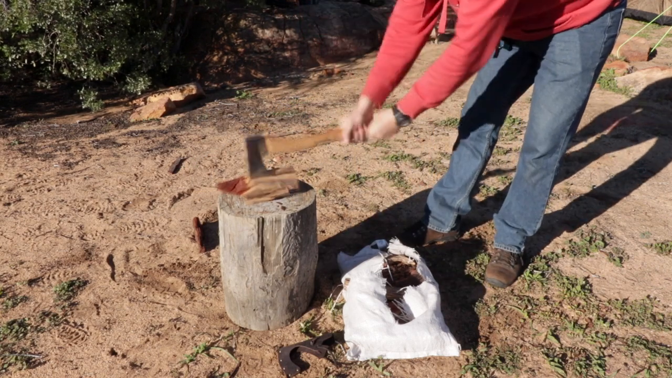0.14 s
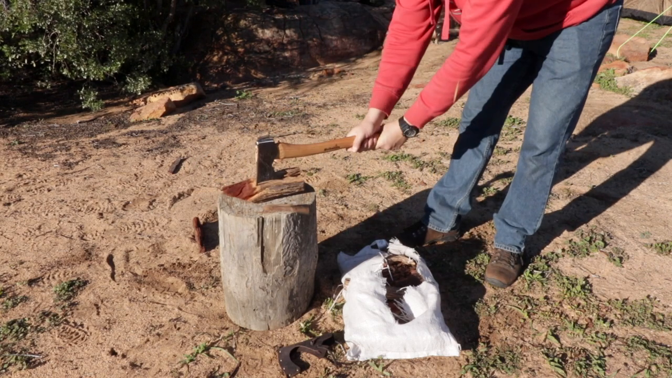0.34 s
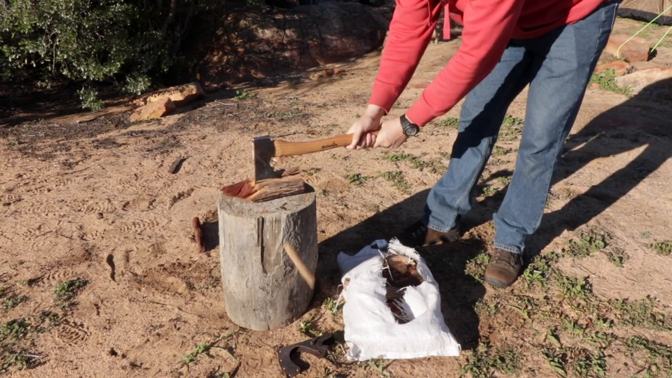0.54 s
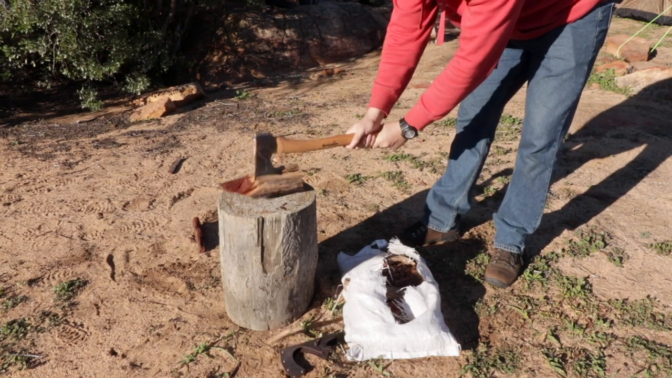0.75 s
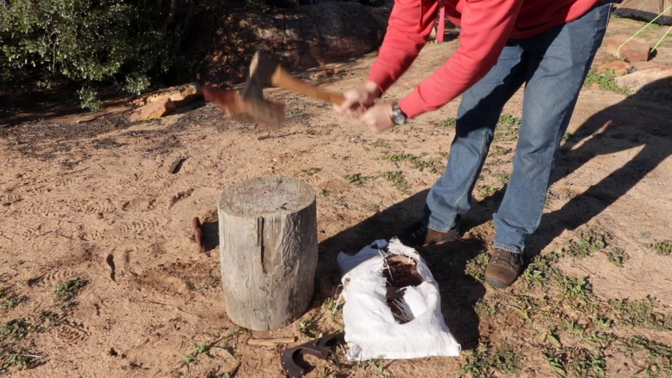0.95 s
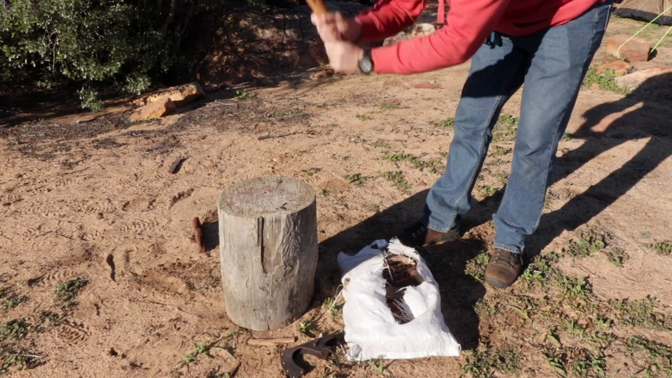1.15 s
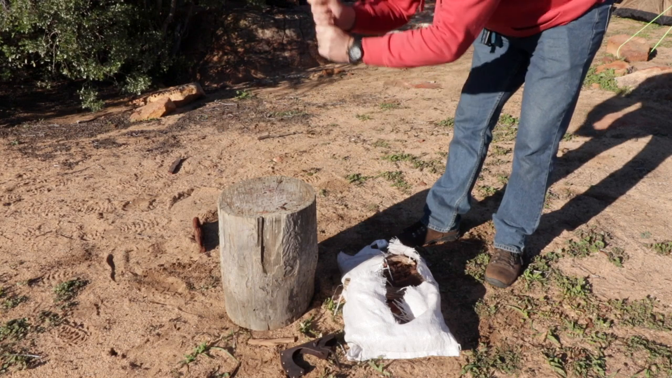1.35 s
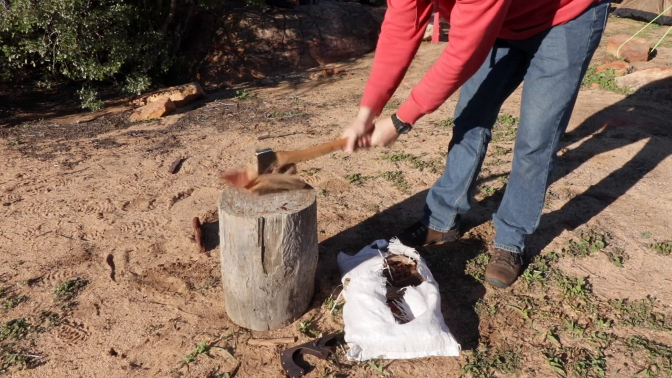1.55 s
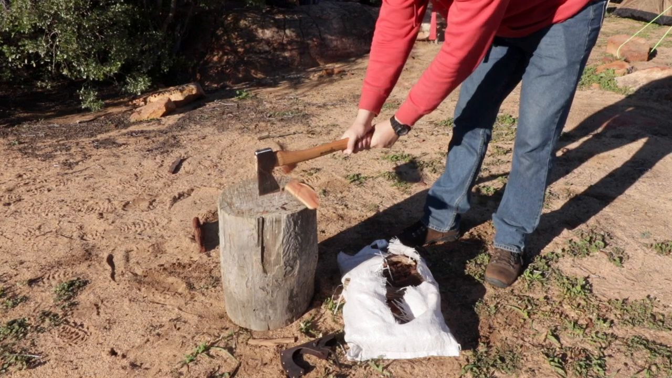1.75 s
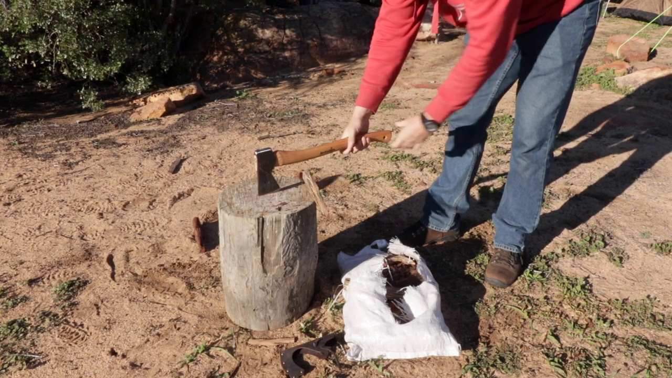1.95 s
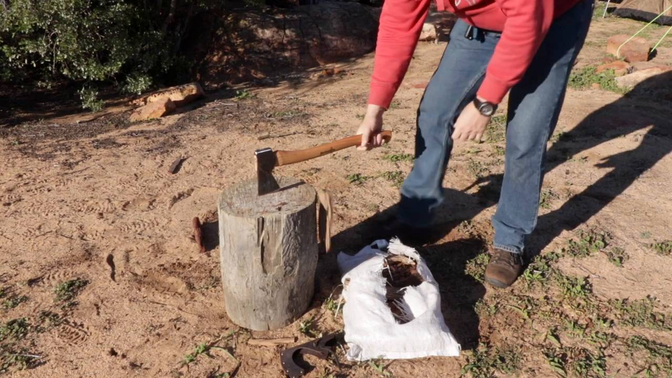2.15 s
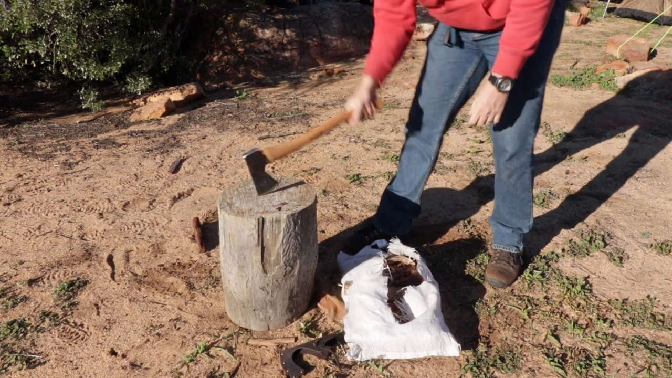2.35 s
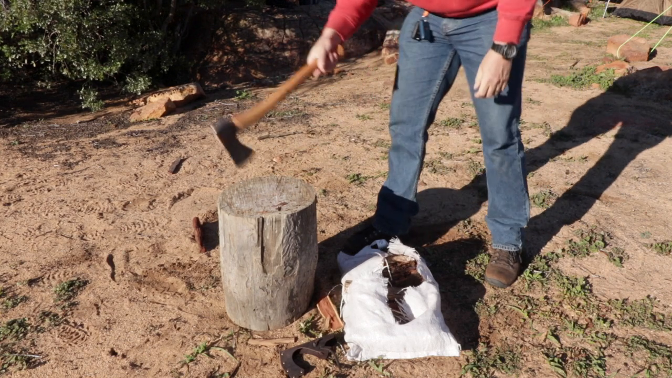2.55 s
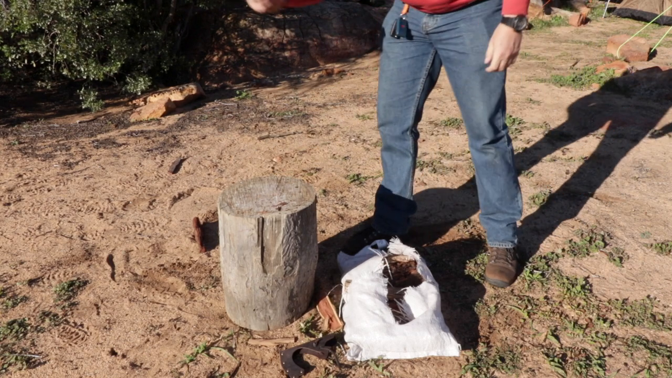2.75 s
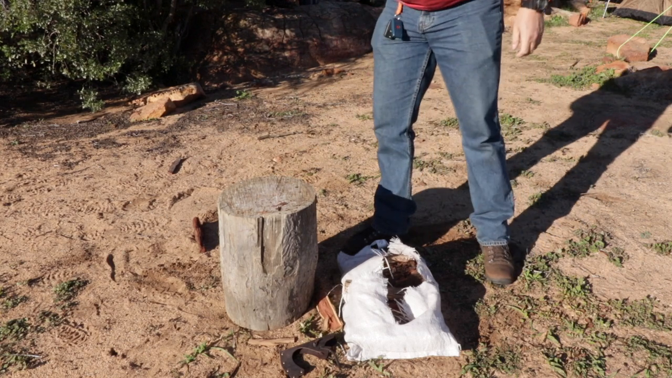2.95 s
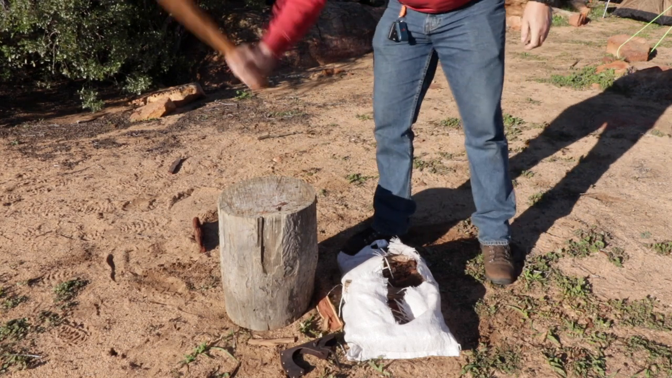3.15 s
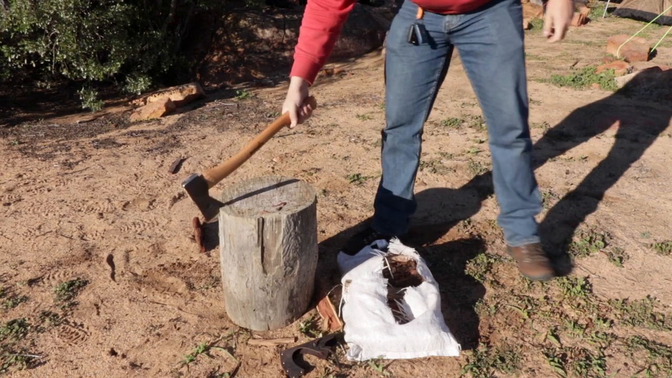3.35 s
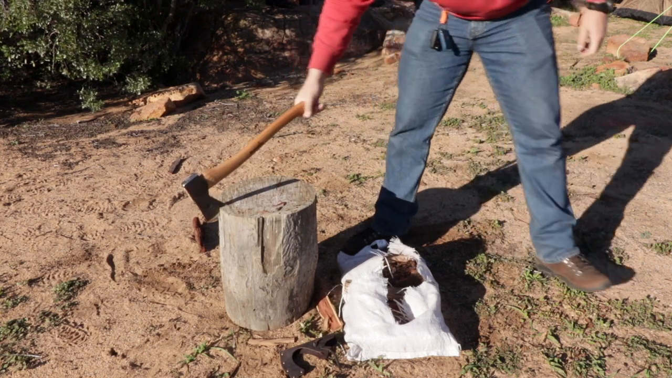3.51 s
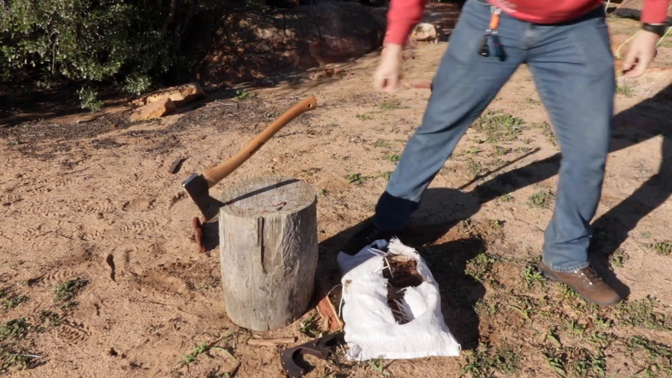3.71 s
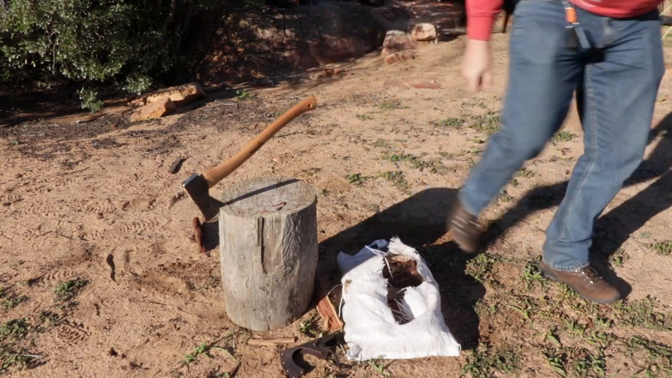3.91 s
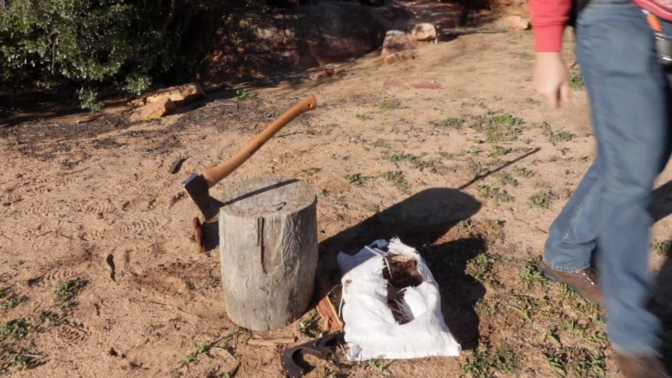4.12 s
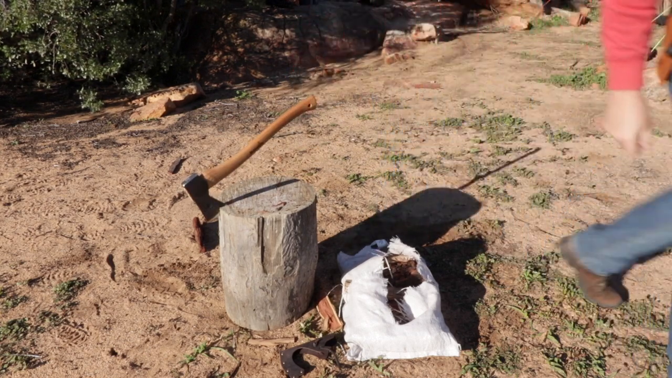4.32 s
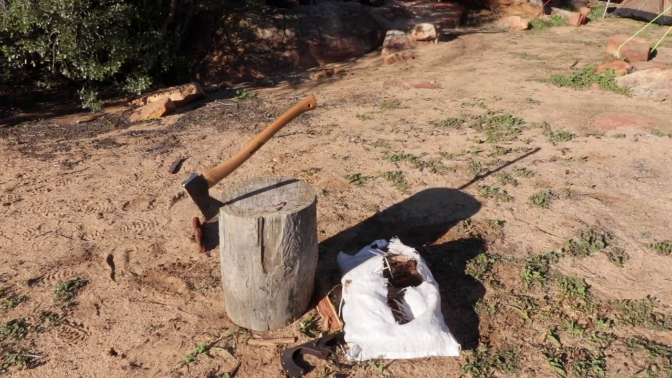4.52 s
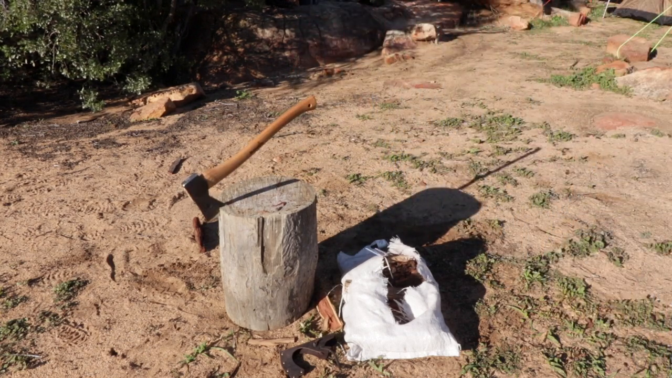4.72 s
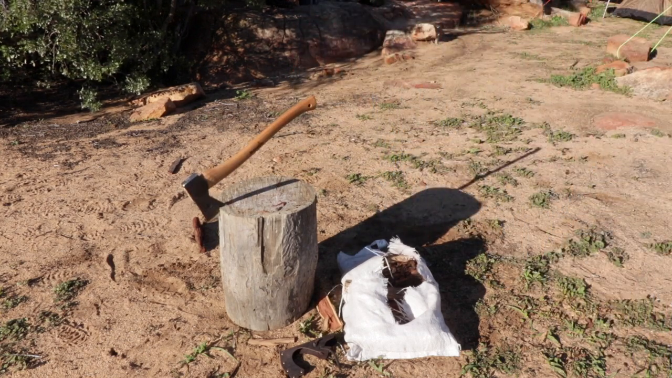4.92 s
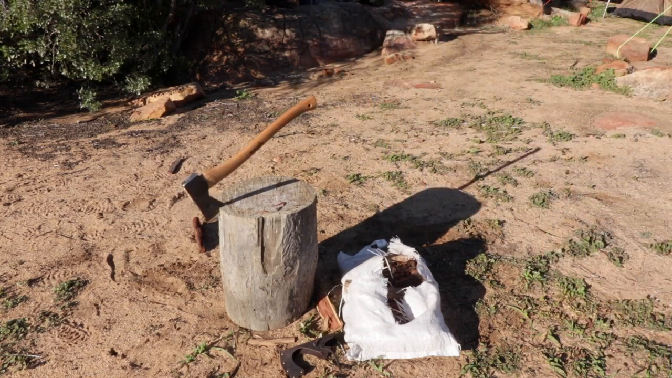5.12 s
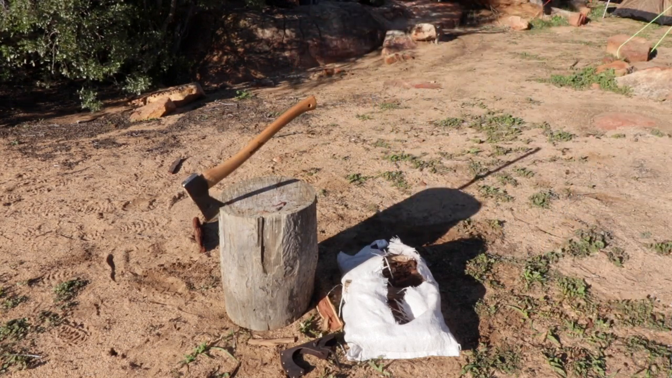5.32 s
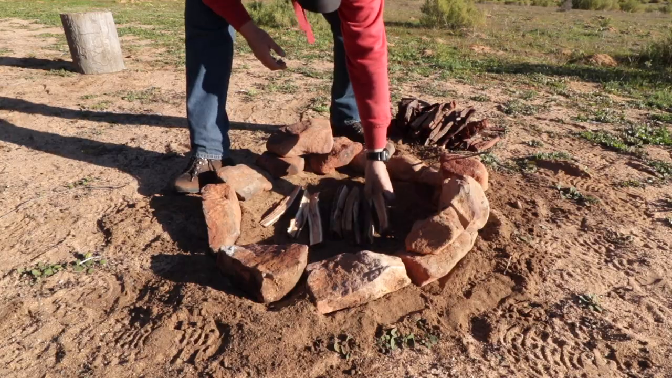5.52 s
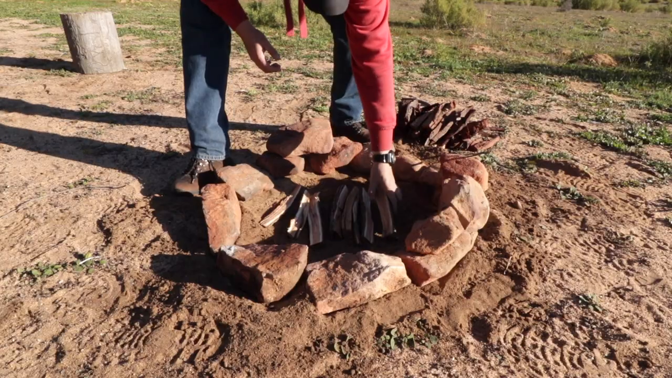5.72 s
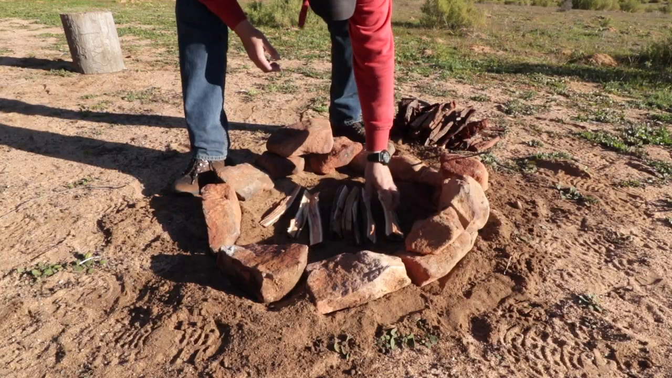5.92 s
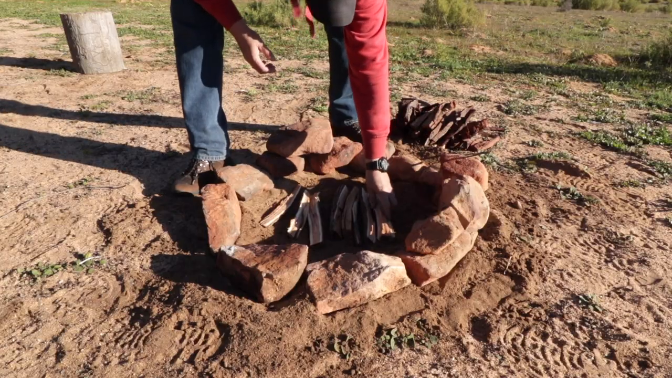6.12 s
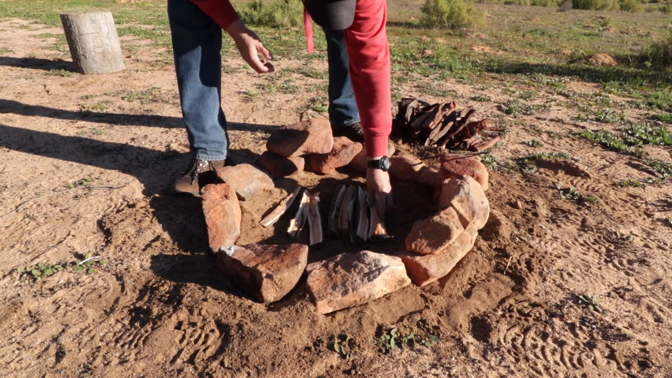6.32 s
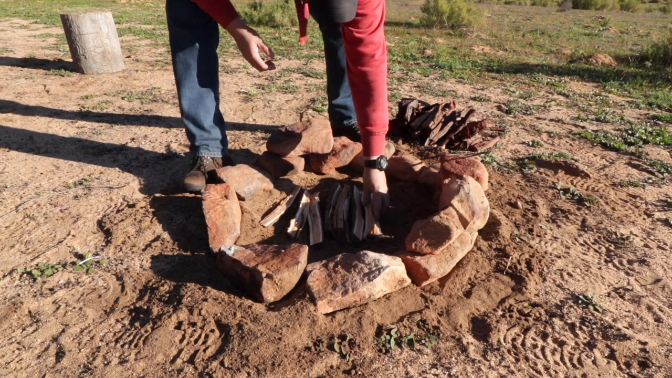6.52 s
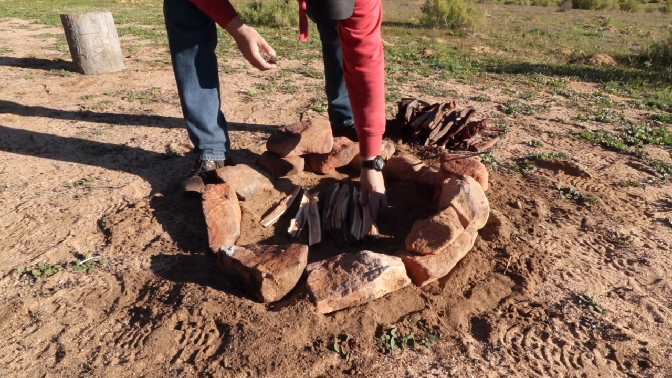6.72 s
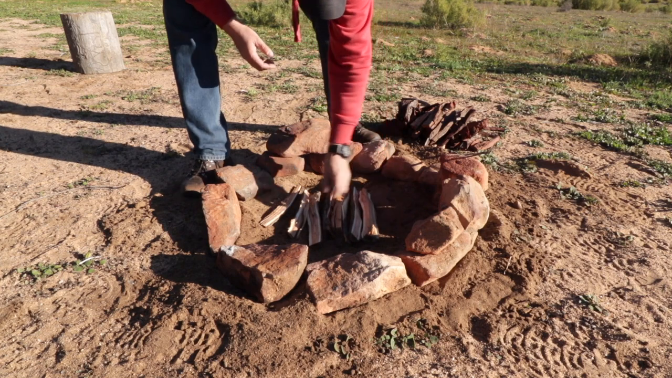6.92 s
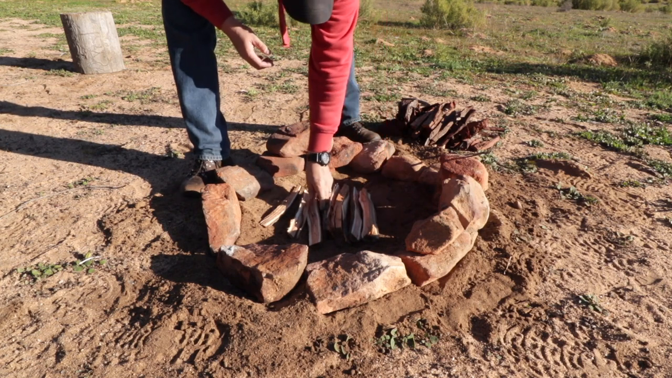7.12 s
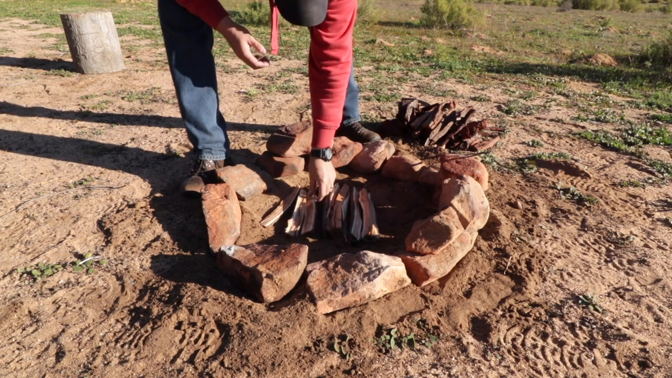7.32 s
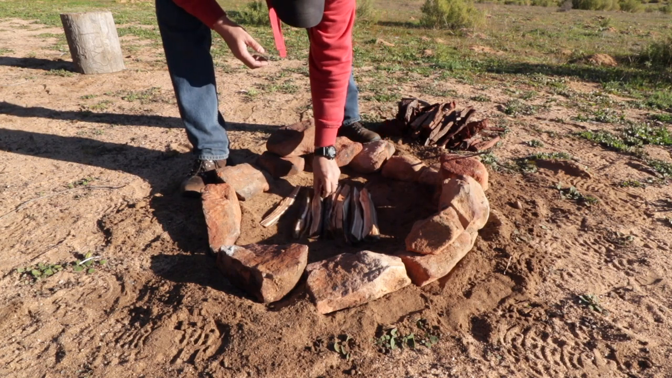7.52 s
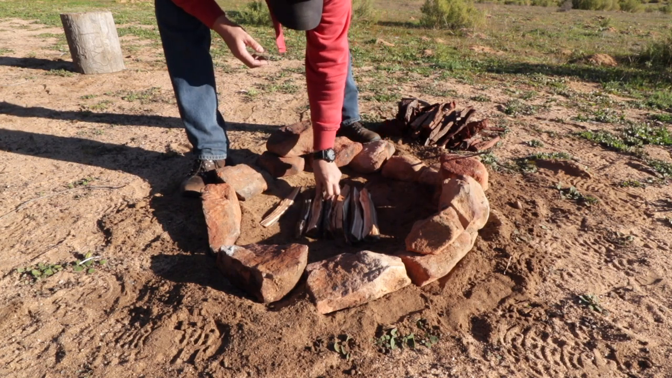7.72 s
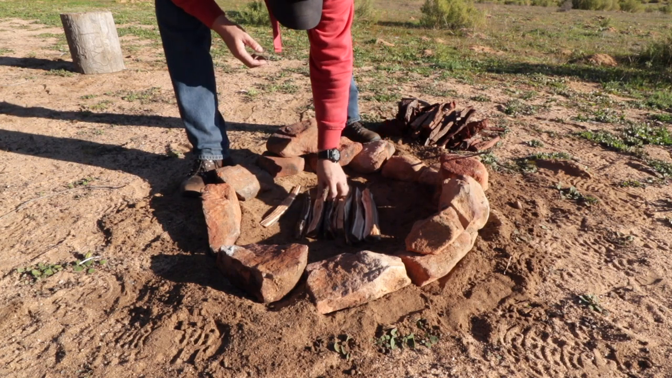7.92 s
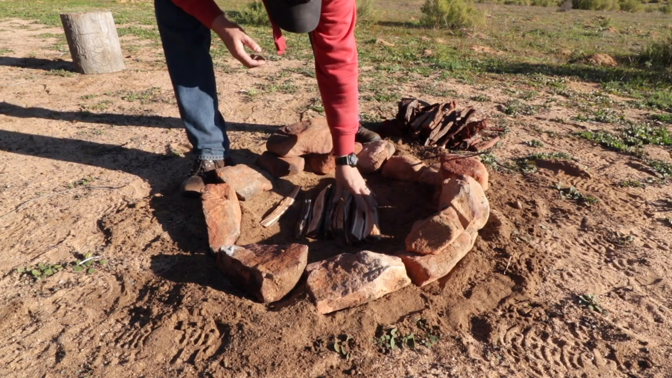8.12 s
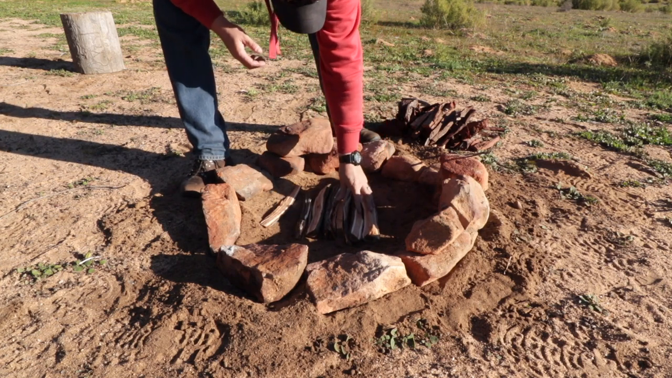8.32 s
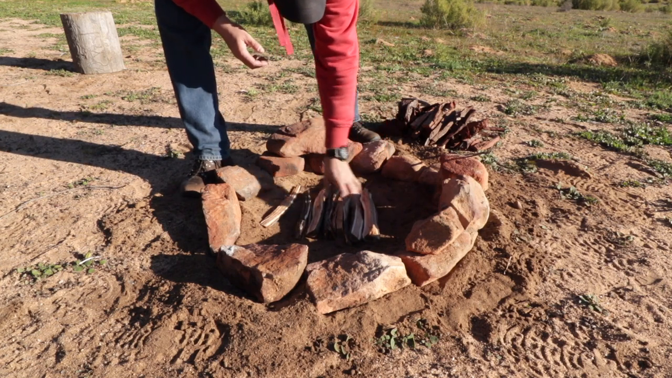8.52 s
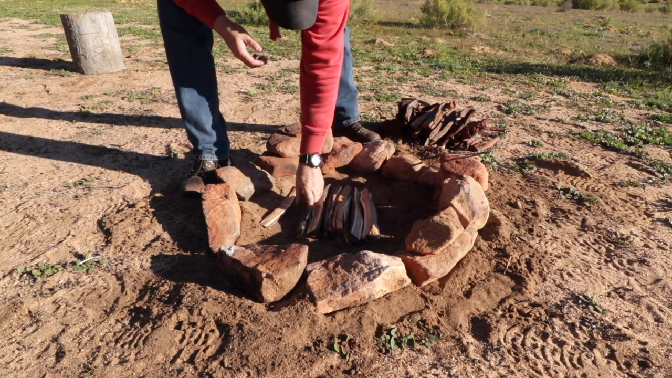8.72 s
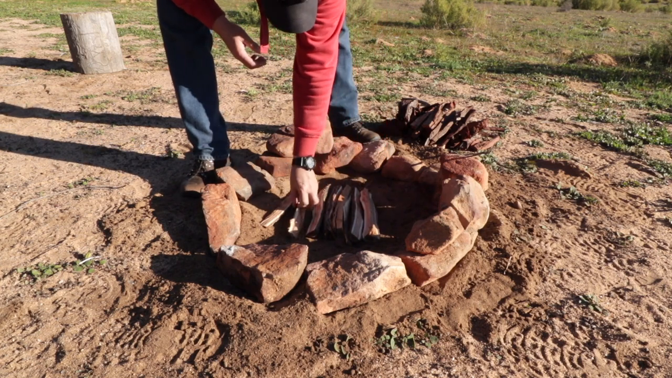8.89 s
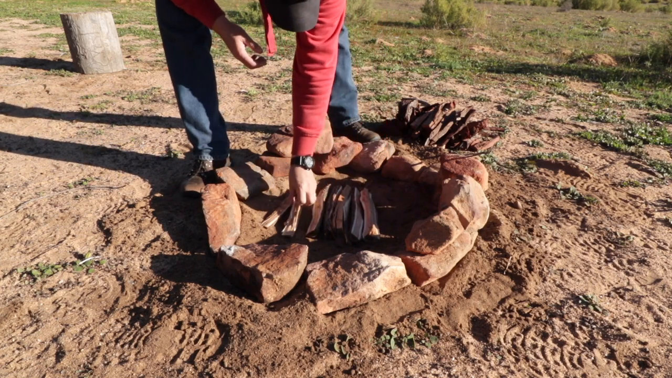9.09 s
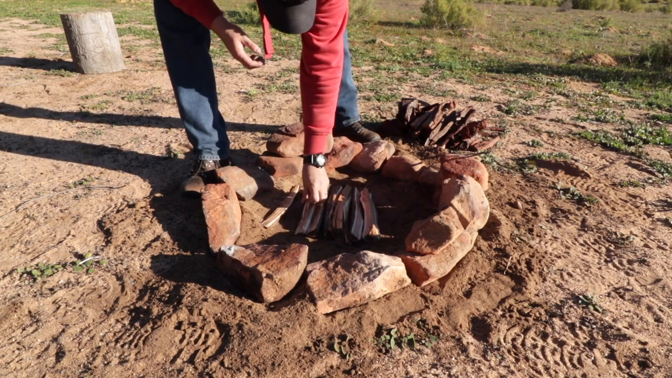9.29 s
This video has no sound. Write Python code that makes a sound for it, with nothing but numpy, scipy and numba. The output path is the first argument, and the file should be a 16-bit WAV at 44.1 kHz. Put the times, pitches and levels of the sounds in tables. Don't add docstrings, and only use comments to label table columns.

```python
import sys
import numpy as np
from scipy import signal
from scipy.fft import rfft, irfft
from scipy.io import wavfile
from scipy.ndimage import uniform_filter1d
from numba import njit

SR = 44100
rng = np.random.default_rng(int(sys.argv[2]) if len(sys.argv) > 2 else 0)


def natural_amplitude(level_db):
    exponent = np.asarray(level_db, float) / 20
    return 10 ** exponent


def to_wav(sig):
    pcm = np.clip(np.atleast_2d(sig), -1, 1) * 32767
    pcm = np.round(pcm).astype(np.int16)
    wavfile.write(sys.argv[1], SR, pcm.T)


N = 412335
SCENE_CHANGE_S = 5.418


def noise():
    return rng.standard_normal(N)


def unit(x):
    return x / np.sqrt(np.mean(x ** 2))


def peak(x):
    return x / np.max(np.abs(x))


def seconds(length_s):
    return np.arange(int(length_s * SR)) / SR


def colour(points, size=4096):
    hz, db = np.transpose(points)
    bin_hz = np.arange(size // 2 + 1) * SR / size
    level_db = np.interp(np.log(bin_hz + 1), np.log(hz), db)
    cepstrum = irfft(np.log(natural_amplitude(level_db)))
    cepstrum[1:size // 2] *= 2
    cepstrum[size // 2 + 1:] = 0
    h = irfft(np.exp(rfft(cepstrum)))
    return h / np.sqrt(np.sum(h ** 2))


def tilted(points, slope_db_per_oct):
    return [(hz, db + slope_db_per_oct * np.log2(hz / 1000)) for hz, db in points]


def shaped(x, points):
    return signal.oaconvolve(x, colour(points))[:len(x)]


def band(x, lo_hz, hi_hz, order=2):
    return signal.sosfilt(signal.butter(order, [lo_hz, hi_hz], "bandpass", fs=SR, output="sos"), x)


@njit
def moving_band(x, hz, width_hz):
    y, b, l = np.empty(len(x)), 0., 0.
    for i in range(len(x)):
        g, k = np.tan(np.pi * hz[i] / SR), width_hz / hz[i]
        v = (b + g * (x[i] - l)) / (1 + g * (g + k))
        b, l, y[i] = 2 * v - b, l + 2 * g * v, k * v
    return y


def fade(t, t60_s):
    return 1000. ** (-t / max(t60_s, .001))


def walk(rate_hz):
    k = int(SR / rate_hz)
    held = np.repeat(rng.standard_normal(N // k + 1), k)
    slewed = uniform_filter1d(uniform_filter1d(held, k), k)
    return unit(slewed[:N])


def curve(rows):
    s, *columns = np.transpose(rows)
    t = np.arange(N) / SR
    return [np.interp(t, s, c) for c in columns] + [(t >= s[0]) & (t <= s[-1])]


def grit(rate_hz, spread_db):
    hits = noise() * (rng.random(N) < rate_hz / SR)
    size_db = spread_db * np.minimum(rng.exponential(size=N), 4)
    return unit(hits * natural_amplitude(size_db))


def add(out, s, x):
    i = int(s * SR)
    out[i:i + len(x)] += x[:N - i]


def strokes(rows):
    out = np.zeros((2, N))
    for s, length_s, *levels_db in rows:
        shape = signal.windows.tukey(int(1.705 * length_s * SR), .9)
        for envelope, db in zip(out, levels_db):
            add(envelope, max(s - 0.38 * length_s, 0), natural_amplitude(db) * shape)
    return out


def ring(push, modes, t):
    out = 0
    for hz, db, t60_s in modes:
        spin = np.exp(2j * np.pi * hz * t)
        reach = max(abs(push @ spin), .3 * np.sqrt(push @ push))
        decay = signal.fftconvolve(push, spin.imag * fade(t, t60_s))[:len(t)]
        out = out + natural_amplitude(db) / reach * decay
    return out


# (frequency [Hz], level [dB], T60 [s])
FIRST_PIECE = [(395, -3.5, 0.012), (580, -4.5, .016), (1020, -4, 0.017), (1610, -3, 0.008),
               (2100, -4, 0.012), (3477, -1, 0.0081), (5170, -8.5, 0.0088)]
# (frequency [Hz], level [dB], T60 [s])
SECOND_PIECE = [(360, -9, .02), (1300, -10.5, .008), (2120, 2, 0.0081), (2890, -4, 0.019),
                (5000, -10.5, .01)]
# (frequency [Hz], level [dB], T60 [s])
FREED_PIECE = [(690, -15, 0.019), (1083, 0, 0.08), (2160, -14.5, 0.035), (4940, -19, .05)]
# (frequency [Hz], level [dB], T60 [s])
LOG_END = [(94, -25, 0.085), (152, -19, .04), (307, 0.5, 0.025), (472, -9.5, 0.028), (1470, -29, 0.006),
           (3680, -10, 0.0085)]
# (frequency [Hz], level [dB], T60 [s])
STUMP = [(93, -10, 0.12), (147, -13.5, 0.013), (305, 0.5, 0.015), (480, -1.5, 0.01)]
# (frequency [Hz], level [dB], T60 [s])
RIM = [(539, -4, 0.025), (694, -1, 0.04), (1023, -2.5, 0.027), (1466, -12, 0.032), (2330, -15, 0.026),
       (2900, -10, 0.013), (3465, -24, 0.02), (4090, -22, 0.035)]
# (frequency [Hz], level [dB], T60 [s])
HANDLE = [(671, 8.5, 0.025), (1520, -4, 0.035), (2290, -14, 0.038), (2930, -16, 0.027), (3476, -21, 0.051),
          (4040, -21, 0.039)]
# (frequency [Hz], level [dB], T60 [s])
PILE = [(750, -8.5, 0.098), (957, -9, 0.037), (1060, -20.5, 0.13), (1440, -4, 0.027), (1870, -0.5, 0.033),
        (3300, -25, 0.044)]
# (frequency [Hz], level [dB], T60 [s])
TWIG = [(1620, 0, 0.025)]
# (frequency [Hz], level [dB], T60 [s])
SOIL = [(203, -10.5, 0.045), (304, -9.5, 0.025)]
# (frequency [Hz], level [dB], T60 [s])
STICK = [(760, -3.5, 0.13), (1100, -11.5, 0.081), (1400, -8, 0.041), (1900, -10, 0.047),
         (2790, -3.5, 0.015), (3700, -26, .015)]
# (frequency [Hz], level [dB], T60 [s])
THIN_STICK = [(749, 2.5, 0.12), (1050, 6, 0.071), (1380, 3, 0.03), (1860, -2, 0.053)]
# (frequency [Hz], level [dB], T60 [s])
THICK_STICK = [(713, -4.5, 0.064), (933, -16.5, 0.026), (1150, -18, 0.013)]
# (frequency [Hz], density [dB/Hz])
CRACK = [(150, -38), (300, -12), (700, -6.5), (1800, -2.5), (3500, -10), (8000, -11.5), (11000, -25),
         (16000, -28)]
# (frequency [Hz], density [dB/Hz])
SPLINTERS = [(180, -39), (400, -8.5), (1000, -2), (2000, -5.5), (3200, -6.5), (4200, -9), (8640, -10.5),
             (16000, -32.5)]
# (modes, crack tilt [dB/oct],
#   [(time [s], contact [s], piece [dB], crack [dB], splinters [dB])])
CHOPS = [
    (FIRST_PIECE, 0.089, [(.2155, .0035, -3, -5, -23), (.2225, 0.0013, -47.5, -22, -40.5), (.229, 0.0013, -44, -28.5, -44.5), (.274, 0.0014, -39.5, -41, -52)]),
    (SECOND_PIECE, 0.16, [(1.6097, 0.0038, -4, -5.5, -23), (1.663, 0.0021, -34.5, -38.5, -48)]),
    (FREED_PIECE, .1, [(1.6178, 0.0019, -13.5, -13.5, -35.5)]),
    (LOG_END, -1.7, [(1.9665, 0.0014, -24.5, -32, -47.5)]),
    (RIM, -1.7, [(3.3055, 0.00425, -16.5, -25.5, -49)]),
    (HANDLE, -2, [(3.3115, 0.0067, -25.5, -49, -60), (3.325, 0.022, -45, -57, -69), (3.358, 0.017, -59, -71, -80)]),
]
# (modes, crack tilt [dB/oct],
#   [(time [s], contact [s], piece [dB], crack [dB], splinters [dB])])
STACKING = [
    (STICK, -0.32, [(5.4775, 0.0044, -18, -26.5, -58)]),
    (PILE, -3.5, [(5.5098, 0.0033, -10.5, -36, -35.5)]),
    (SOIL, .1, [(5.533, 0.0039, -9, -53, -42.5)]),
    (THIN_STICK, -3, [(5.865, 0.0038, -34, -37.5, -68), (7.788, 0.00067, -45, -36.5, -39.5)]),
    (TWIG, .1, [(8.535, 0.005, -35.5, -61, -78.5)]),
    (THICK_STICK, -3.5, [(9.262, 0.0033, -12, -57, -46), (9.289, 0.0022, -26.5, -54, -59)]),
]


def blows():
    stump_share_db, ground_share_db = -22, -47
    out, t = np.zeros(N), seconds(0.2)
    running = fade(t, 0.14) / (1 + (t / 0.084) ** 10)
    for piece, tilt_db_per_oct, rows in CHOPS + STACKING:
        crack = colour(tilted(CRACK, tilt_db_per_oct))
        splinters = colour(tilted(SPLINTERS, tilt_db_per_oct))
        for s, contact_s, piece_db, crack_db, splinter_db in rows:
            rough, debris, uneven = rng.standard_normal((3, len(t)))
            push = rough * np.where(t < contact_s, 1, fade(t - contact_s, .006))
            debris = debris * natural_amplitude(26. * uniform_filter1d(uneven, size=60))
            share_db = stump_share_db if s < SCENE_CHANGE_S else ground_share_db
            below = natural_amplitude(share_db) * ring(np.abs(push), STUMP, t)
            add(out, s, natural_amplitude(piece_db) * (ring(push, piece, t) + below))
            add(out, s, natural_amplitude(crack_db) * signal.fftconvolve(push, crack))
            add(out, s, natural_amplitude(splinter_db) * signal.fftconvolve(debris * running, splinters))
    return band(out, 90, 19000)


# (time [s], peak [dB], ring [Hz], body [dB])
CHIPS = [(0.3268, -32.5, 4570, -42), (0.337, -41.5, 3000, -26), (0.377, -56, 1584, -18.5),
         (0.43, -58, 956, -7.5), (0.681, -39.5, 2120, -2), (0.704, -44.5, 1233, -6),
         (1.175, -63, 1700, -25), (1.711, -35, 3080, -38), (1.791, -46.5, 716, -1.5),
         (1.847, -45, 697, -17.5), (2.069, -44.5, 5300, -18.5), (2.177, -46, 301, -15),
         (2.198, -52, 2900, -20), (2.211, -51, 2900, -19), (2.223, -55, 2890, -20),
         (2.332, -45.5, 3110, -19), (2.362, -39.5, 1260, -15), (2.44, -38, 1790, -1.5),
         (2.454, -51, 735, 8), (2.506, -56, 3090, -25), (2.544, -56, 3180, -16), (4.354, -54.5, 966, 2),
         (1.931, -58, 850, -23), (5.16, -55, 1786, -22.5)]
# (time [s], peak [dB], ring [Hz], body [dB])
KNOCKS = [(5.8184, -35.5, 2480, -18), (5.9094, -41, 2500, -7), (6.1536, -40.5, 1860, 0),
          (6.222, -28, 1440, -12), (6.256, -27.5, 1150, -19), (6.284, -22, 1870, -21),
          (6.3225, -38, 2550, -22), (6.3545, -61, 720, -31), (6.4179, -33.5, 1380, -20),
          (6.4873, -39, 1620, -12), (7.211, -37, 1810, -9), (7.334, -35, 1770, -12),
          (7.5305, -33, 716, -17), (7.569, -34, 6000, -26), (7.832, -43, 795, -1),
          (8.1657, -41.5, 2430, -28), (8.249, -40, 1380, -43), (8.306, -35, 1780, -28),
          (8.43, -41, 5970, -25), (8.711, -40, 2600, -21.5), (8.739, -46, 1580, -20),
          (8.973, -32, 3050, -21), (8.988, -33, 4520, -9)]


def chips_and_knocks():
    out, t = np.zeros(N), seconds(1 / 12)
    for s, db, hz, body_db in CHIPS + KNOCKS:
        bump, tick = rng.standard_normal(len(t)) * [fade(t, .025), fade(t, .008)]
        body = natural_amplitude(body_db) * peak(band(bump, 320, 1880))
        note = natural_amplitude(-3) * peak(band(bump, 0.88 * hz, 1.064 * hz, order=1))
        edge = natural_amplitude(-21) * peak(band(tick, 2000, 22000))
        clack = natural_amplitude(-15) * peak(band(tick, 1300, 8000))
        add(out, s, natural_amplitude(db) * (body + note + edge + clack))
    return out


# (time [s], peak [dB])
SNAPS = [(.3265, -42), (.829, -45), (0.901, -49), (1.793, -47), (.919, -53), (2.331, -46), (2.362, -40),
         (2.441, -36.5), (5.7661, -42), (6.118, -25.5), (6.28, -34.5), (6.409, -36), (6.8386, -35.5),
         (7.211, -40), (7.2694, -37), (7.3158, -32.5), (7.444, -38.5), (7.642, -35), (7.531, -43),
         (8.2898, -38), (8.3069, -26), (8.3966, -32.5), (8.4541, -47), (8.882, -40), (8.897, -41),
         (9.194, -41), (8.711, -42), ]


def snaps():
    out, t = np.zeros(N), seconds(1 / 12)
    for s, db in SNAPS:
        tick = rng.standard_normal(len(t)) * fade(t, 0.0126)
        lo_hz = 2800 * 2 ** rng.uniform(-.5, .5)
        treble = peak(band(tick, lo_hz, 15600))
        dull = natural_amplitude(-15.5) * peak(band(tick, 400, 3400))
        add(out, s, natural_amplitude(db) * (treble + dull))
    return out


# (time [s], peak [dB], centre [Hz])
TICKS = [(0.236, -19, 8500), (.314, -40, 2570), (.32, -44, 5000), (0.3503, -55.5, 8210),
         (1.692, -43, 7500), (1.712, -50.5, 8530), (1.796, -42, 7020), (1.81, -49, 8400),
         (1.8618, -44.5, 7000), (1.974, -35.5, 4300), (1.985, -54, 8500), (2.012, -53.5, 7530),
         (2.2479, -54, 4140), (2.343, -42.5, 7460), (2.3844, -54.5, 7910), (2.4199, -46, 7220),
         (2.428, -46, 4800), (2.4654, -54, 7000), (2.4804, -57, 8330), (2.493, -50.5, 4470),
         (5.5314, -31, 6160), (5.5524, -49, 4000), (5.7714, -37, 8300), (5.825, -40, 7800),
              (5.841, -37, 5000), (5.8754, -37, 7500), (6.111, -48, 6900), (6.1304, -52, 4740),
              (6.1904, -44, 8000), (6.226, -31, 4500), (6.3218, -30.5, 4470), (6.355, -34, 4380),
              (6.457, -37, 7800), (6.49, -34, 4350), (6.5384, -42, 8000), (6.621, -45, 7500),
              (6.653, -41, 8300), (7.2214, -52, 8870), (7.3138, -32.5, 4770), (7.3317, -33, 4600),
              (7.407, -41, 7500), (7.418, -35, 6500), (7.5306, -26.5, 4700), (7.596, -46, 4500),
              (7.679, -44, 5000), (7.793, -33, 7040), (7.8014, -25, 6500), (7.8144, -38, 8000),
              (7.876, -43, 7500), (7.942, -41, 7850), (8.005, -39.5, 5400), (8.108, -44, 5930),
              (8.1488, -42, 6000), (8.177, -30, 5200), (8.198, -37, 6500), (8.2624, -33.5, 7000),
              (8.313, -32, 8000), (8.3489, -44, 7000), (8.397, -36, 5390), (8.453, -41, 5410),
              (8.5285, -38, 8220), (8.6817, -47, 6300), (8.7404, -41, 5890), (8.837, -41, 4310),
              (8.9306, -45, 7500), (8.961, -42, 7500), (8.973, -31, 7800), (9.1754, -43, 9120),
              (9.2724, -46, 7500), (9.2944, -41, 8000), (9.3414, -43, 7100)]


def splinter_ticks():
    out, t = np.zeros(N), seconds(0.05)
    for s, db, hz in TICKS:
        tick = rng.standard_normal(len(t)) * fade(t, 0.0039)
        add(out, s, natural_amplitude(db - 2.5) * peak(band(tick, .7 * hz, 1.25 * hz)))
    return out


# (time [s], peak [dB], ring [Hz], T60 [s])
TAPS = [(1.894, -52, 896, 0.016), (2.19, -55, 2880, .012), (2.19, -54, 1905, .012), (.832, -56.5, 300, .03),
        (.9, -61, 480, .03), (5.524, -25, 1870, .015), (5.524, -42, 2900, .012), (5.848, -36, 2530, .02),
        (5.865, -38.5, 2864, 0.044), (5.877, -42, 2490, 0.028), (6.227, -40, 1900, .015),
        (6.261, -34, 1660, 0.021), (6.282, -33, 3300, 0.016), (6.286, -29.5, 1200, 0.02),
        (6.287, -36, 2500, .012), (6.5647, -47, 2370, .015), (6.5747, -39, 2450, .015),
        (6.619, -34, 2440, 0.013), (7.342, -41, 1200, 0.036), (7.358, -40, 1850, .025),
        (7.378, -37.5, 780, 0.013), (7.639, -42, 3300, .015), (7.805, -33, 890, 0.01),
        (7.832, -43, 2600, .012), (8.274, -43, 1300, .012), (8.314, -37, 1850, .015),
        (8.316, -40, 2970, .012), (8.961, -42, 4650, .025), (9.273, -38, 4500, .02),
        (9.295, -38, 1340, .03)]


def taps():
    out, t = np.zeros(N), seconds(0.05)
    for s, db, hz, t60_s in TAPS:
        push = rng.standard_normal(len(t)) * fade(t, .003)
        add(out, s, natural_amplitude(db) * peak(ring(push, [(hz, 0, t60_s)], t)))
    return out


# (time [s], length [s], resonance [Hz], level [dB])
CREAKS = [(0.219, 0.076, 3300, -43), (0.231, 0.023, 1700, -42), (.43, 0.22, 843, -84),
          (0.461, .2, 1300, -80), (1.625, 0.035, 2340, -44.5), (1.703, 0.034, 1090, -62),
          (1.908, 0.053, 817, -66), (1.981, 0.054, 2700, -66), (1.995, 0.017, 1620, -68),
          (2.174, 0.082, 1900, -72), (5.416, 0.037, 1850, -61.5), (6.554, 0.085, 2370, -59),
          (7.26, 0.087, 1830, -52.5), (7.272, 0.078, 3240, -53), (7.33, 0.065, 1870, -53),
          (7.407, 0.061, 3240, -59), (8.272, 0.07, 1820, -58), (8.732, 0.055, 2600, -62),
          (8.862, 0.055, 2750, -63), (9.123, 0.076, 2570, -59.5), (9.123, 0.072, 4500, -63.5),
          (9.237, 0.08, 2630, -54.5)]


def creaks():
    half_width = 0.043
    out = np.zeros(N)
    slip = grit(4000, 2.2) * natural_amplitude(1.6 * walk(80))
    for s, length_s, hz, db in CREAKS:
        piece = slip[int(s * SR):int((s + length_s) * SR)]
        chatter = band(piece, (1 - half_width) * hz, (1 + half_width) * hz)
        add(out, s, natural_amplitude(db) * unit(chatter) * signal.windows.tukey(len(chatter), .6))
    return out


# (time [s], length [s], rasp [dB], hiss [dB])
DRAG = [(5.42, 0.14, -62, -58), (5.76, 0.13, -59, -65), (5.84, 0.019, -52, -59), (5.868, 0.011, -51, -41.5),
        (6.11, 0.2, -50, -56.5), (6.4, 0.087, -56.5, -62), (6.5, 0.18, -48.5, -57), (7.1, 0.38, -57, -64),
        (7.335, 0.09, -51, -69), (7.39, 0.15, -69, -81), (7.52, 0.078, -53.5, -67),
        (7.62, 0.049, -55.5, -60), (7.79, 0.021, -74, -43.5), (7.81, 0.071, -51.5, -59.5),
        (7.91, 0.021, -57.5, -58), (8.16, 0.041, -54.5, -51), (8.24, 0.18, -58.5, -62),
        (8.5, 0.041, -68, -51), (8.715, 0.064, -71, -71), (8.82, 0.032, -54, -69),
        (8.94, 0.066, -52, -50.5), (9.14, 0.21, -59, -59.5), (9.235, 0.044, -70, -58)]
# (until [s], [(resonance [Hz], width [Hz], level [dB])])
HELD = [
    (7.0, [(1150, 300, 4), (1850, 350, 5), (2520, 200, 7)]),
    (7.5, [(1300, 1600, 19), (1850, 56, 8), (3280, 78, 4)]),
    (9.35, [(1300, 780, 4), (1800, 910, -2.5), (2570, 300, 1), (4500, 320, -8)]),
]
# (frequency [Hz], density [dB/Hz])
HISS = [(1800, -27.5), (3000, -5), (6500, -1), (8400, 6), (10000, -11), (13000, -1), (15700, -12.5),
        (16300, -49.5)]


def drag():
    rasp, hiss = strokes(DRAG)
    wobble = natural_amplitude(2.5 * walk(60))
    slip = grit(6000, 3.8) * wobble
    bark = natural_amplitude(-34.0) * unit(band(slip, 460, 4300))
    sticks, start = np.zeros(N), 0
    for until_s, modes in HELD:
        held = 0
        for hz, width_hz, db in modes:
            mode = band(slip, hz - width_hz / 2, hz + width_hz / 2, order=1)
            held = held + natural_amplitude(db) * mode / np.sqrt(width_hz)
        stop = int(until_s * SR)
        sticks[start:stop] = (unit(held) + bark)[start:stop]
        start = stop
    fibres = grit(7000, 3.4) * wobble * natural_amplitude(2.5 * walk(90))
    after_change = np.arange(N) / SR > SCENE_CHANGE_S
    return (rasp * sticks + hiss * unit(shaped(fibres, HISS))) * after_change


# (time [s], length [s], crunch [dB], hiss [dB])
SCUFFS = [(0, 0.12, -71, -83), (.335, 0.045, -65, -67.5), (.4, 0.42, -79, -86), (.67, 0.11, -73.5, -81),
          (1.885, 0.031, -60, -77), (1.93, 0.041, -67.5, -79), (2.03, 0.22, -74, -86),
          (2.11, 0.013, -88, -76.5), (2.17, 0.18, -76.5, -80), (2.335, 0.053, -59.5, -57.5),
          (2.41, 0.065, -59, -59), (2.48, 0.15, -72.5, -73.5), (2.78, 0.12, -71, -77.5),
          (3.52, 0.093, -77, -69), (3.6, 0.13, -69, -72.5), (3.76, 0.07, -63, -70.5), (3.85, .25, -81, -90),
          (4.15, 0.15, -80, -84), (4.275, 0.13, -63, -73.5), (4.39, 0.056, -67.5, -82),
          (4.5, 0.17, -74, -86), (4.68, 0.059, -72, -82), (4.75, 0.066, -65.5, -68), (4.8, .11, -66, -72.5),
          (5.15, 0.022, -73, -65), (5.245, 0.12, -67.5, -70)]
# (frequency [Hz], density [dB/Hz])
SAND = [(120, -38), (200, -4), (857, -3), (5000, -17.5), (6500, -34.5), (11000, -120)]


def scuffs():
    crunch, hiss = strokes(SCUFFS)
    grains = grit(3000, 3.3) * natural_amplitude(2.5 * walk(70))
    return crunch * unit(shaped(grains, SAND)) + hiss * unit(shaped(grains, HISS))


# (time [s], flutter [dB])
GUSTS = [(5.42, -45.5), (5.62, -55.5), (5.75, -40.5), (6.0, -42.5), (6.22, -36), (6.44, -35), (6.62, -40.5),
         (6.9, -52.5), (7.2, -52), (7.47, -39), (7.66, -48), (7.82, -40.5), (8.3, -49.5), (8.6, -44.5),
         (9.0, -44), (9.35, -63)]
# (frequency [Hz], density [dB/Hz])
BUFFET = [(7.1, -36), (12, -4.5), (27, -4), (66, -10.5), (174, -18), (294, -28.5), (800, -51.5),
          (1170, -102)]


def gusts():
    split_hz, mean_gust_db = 100, -45.5
    flutter_db, on = curve(GUSTS)
    pressure_db = -33 + 0.84 * (flutter_db - mean_gust_db)
    low_pass = signal.butter(2, split_hz, fs=SR, output="sos")
    high_pass = signal.butter(2, split_hz, "high", fs=SR, output="sos")
    slow = unit(signal.sosfilt(low_pass, shaped(noise(), BUFFET)))
    quick = signal.sosfilt(high_pass, shaped(noise(), BUFFET))
    quick = quick * (1 + .5 * np.abs(slow)) * natural_amplitude(2.0 * walk(30))
    gate = uniform_filter1d(1. * on, size=300)
    return gate * (natural_amplitude(pressure_db) * slow + natural_amplitude(flutter_db) * unit(quick))


# (time [s], eddy rate [Hz], level [dB])
BREEZE = [
    (0, 69.67, -47),
    (.8, 58.4, -53.5),
    (1.2, 57.95, -51),
    (2.35, 55.73, -51),
    (2.6, 72.9, -48.5),
    (3.2, 59.65, -53.5),
    (3.5, 66.63, -52),
    (4.45, 56.93, -51),
    (5.41, 43.8, -59.5),
]
# (frequency [Hz], density [dB/Hz])
BREEZE_WASH = [(8.8, -45.5), (15, -15), (64, -2), (87, -18.5), (124, -9.5), (258, -41), (500, -56),
               (650, -83.5)]


def breeze():
    hz, db, on = curve(BREEZE)
    hz = hz * (1 + 0.021 * walk(4.9))
    eddy = unit(moving_band(moving_band(noise(), hz, 21.0), hz, 21.0))
    loose = .6 * moving_band(noise(), 2 * hz, 40.)
    octave = unit(moving_band(eddy ** 2 + loose, 2 * hz, 32.0))
    wash = unit(shaped(noise(), BREEZE_WASH)) * natural_amplitude(1.5 * walk(30))
    return on * natural_amplitude(db) * (eddy + natural_amplitude(-11) * octave + natural_amplitude(-6.0) * wash)


# (time [s], length [s], start [Hz], end [Hz], level [dB])
BIRDS = [
    (0, 0.06, 1811, 1822, -62.5),
    (.048, 0.062, 1815, 1790, -68),
    (0.08, 0.135, 1900, 2715, -54.5),
    (0.744, 0.071, 2750, 2550, -82),
    (1.242, .06, 2286, 1940, -87),
    (1.285, 0.17, 1690, 1630, -93),
    (2.631, .115, 2590, 2040, -77),
    (4.45, 0.064, 3405, 3320, -79),
    (4.663, 0.04, 2900, 2690, -74.5),
]


def birds():
    rise_s, edge_s = .034, 0.016
    out = np.zeros(N)
    for s, length_s, from_hz, to_hz, db in BIRDS:
        t = seconds(length_s)
        glide_s, bend = (rise_s, 1.8) if to_hz > from_hz else (length_s, 1)
        left = 1 - np.minimum(t / glide_s, 1)
        hz = to_hz + (from_hz - to_hz) * left ** bend
        swell = np.minimum(np.minimum(t, length_s - t) / edge_s, 1)
        add(out, s, swell * natural_amplitude(db + 3.5) * np.sin(2 * np.pi * np.cumsum(hz) / SR))
    t = seconds(0.25)
    bushes = rng.standard_normal(len(t)) * fade(t, 0.23)
    return out + natural_amplitude(-37.0) * signal.fftconvolve(out, bushes)[:N]


# (frequency [Hz], density [dB/Hz])
AIR = [(120, -27), (200, -1), (380, -11.5), (1500, -15), (4250, -22.5), (8300, -23.5), (15700, -26.5),
       (16400, -48.5)]


def air():
    level_db, gain_step_db = -75.5, 18.5
    step_db = gain_step_db * (np.arange(N) / SR > SCENE_CHANGE_S)
    return natural_amplitude(level_db + step_db + 0.6 * walk(2.3)) * unit(shaped(noise(), AIR))


def scene():
    wood = blows() + chips_and_knocks() + snaps() + splinter_ticks() + taps() + creaks() + drag()
    wind = gusts() + breeze()
    return (wood + scuffs() + wind + birds() + air())[None]


def top_cut(x):
    return signal.sosfilt(signal.butter(12, 16900, fs=SR, output="sos"), x)


def record(dry):
    clip = .41
    flat = dry / (1 + (np.abs(dry) / clip) ** 6) ** (1 / 6)
    low_pass = signal.ellip(8, .2, 70, 16300, fs=SR, output="sos")
    return top_cut(signal.sosfilt(low_pass, flat))


dry = scene()
out = record(dry)
to_wav(out)
```